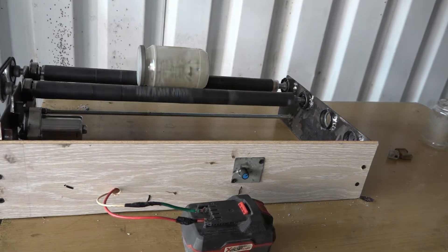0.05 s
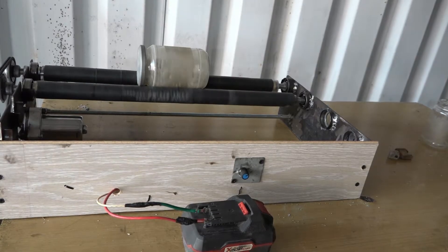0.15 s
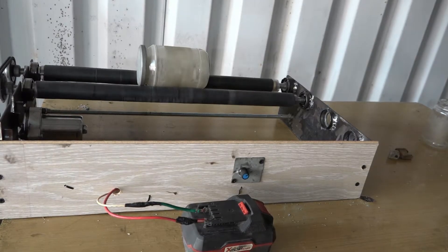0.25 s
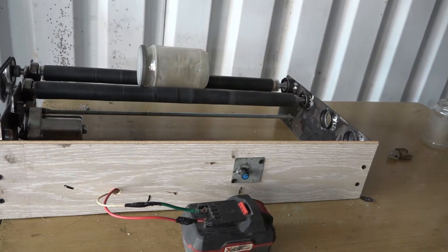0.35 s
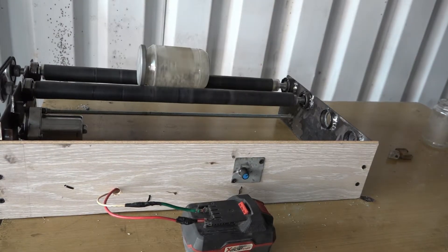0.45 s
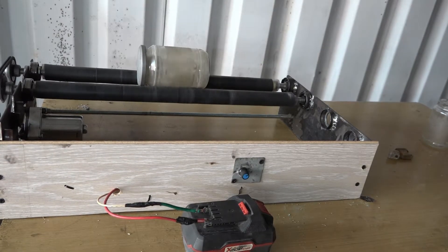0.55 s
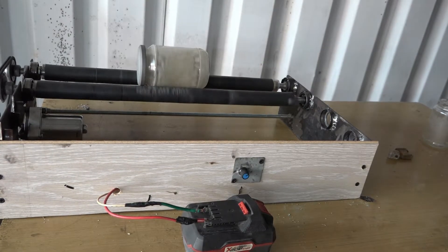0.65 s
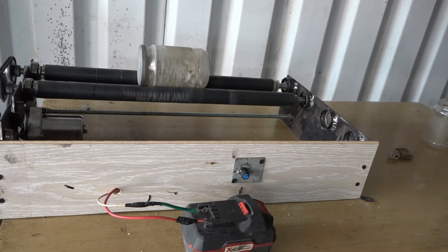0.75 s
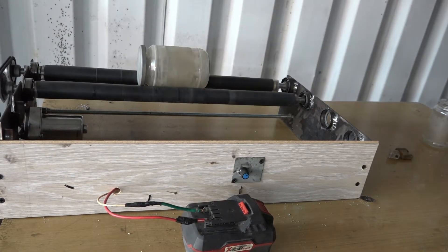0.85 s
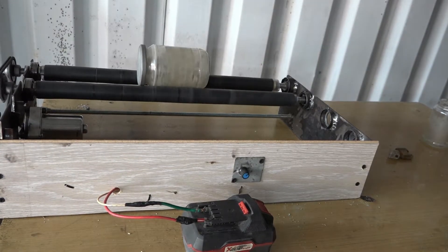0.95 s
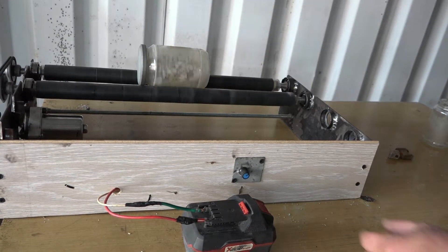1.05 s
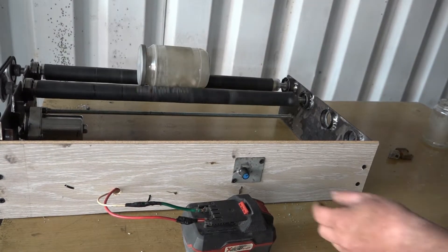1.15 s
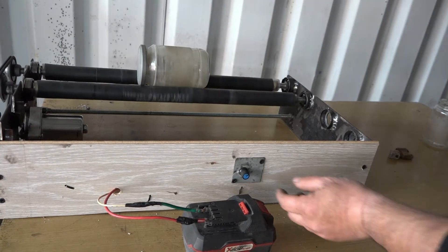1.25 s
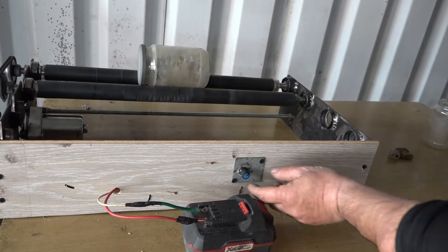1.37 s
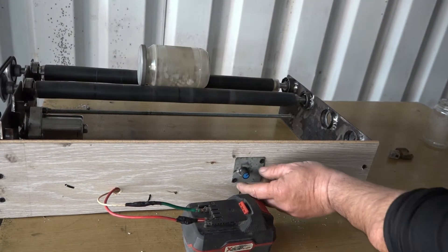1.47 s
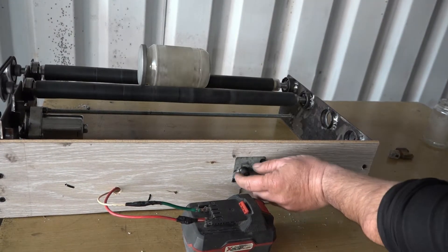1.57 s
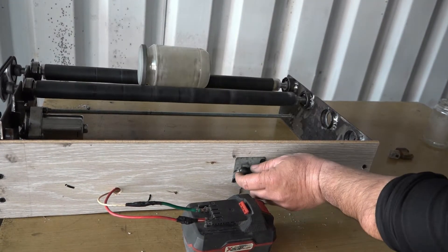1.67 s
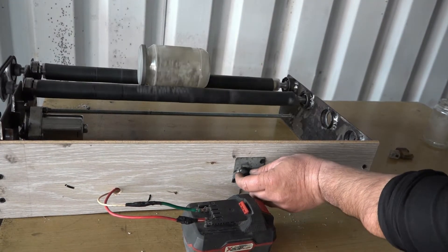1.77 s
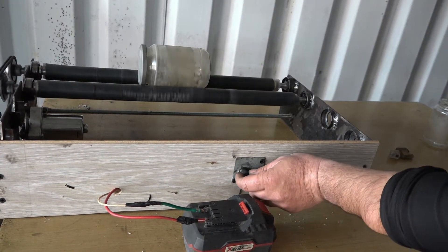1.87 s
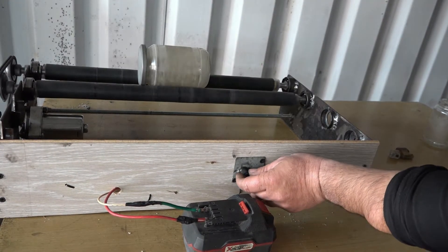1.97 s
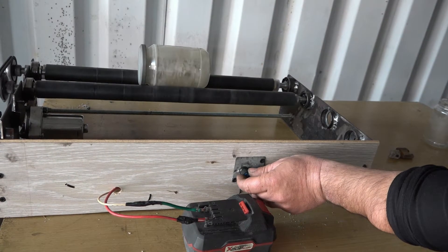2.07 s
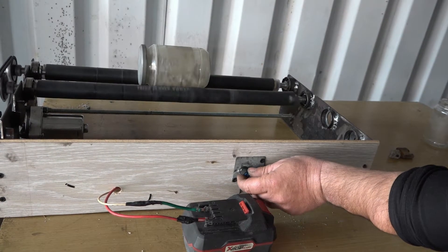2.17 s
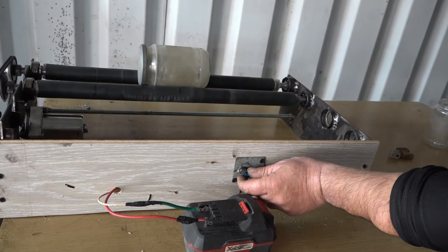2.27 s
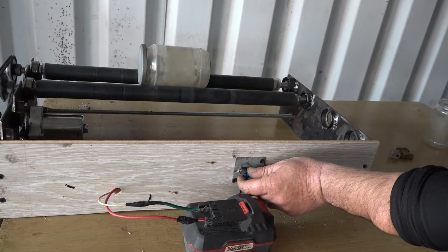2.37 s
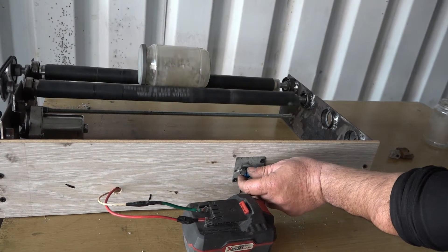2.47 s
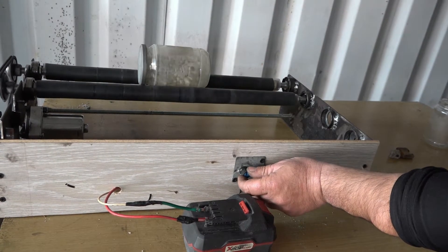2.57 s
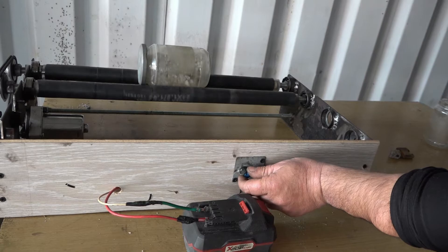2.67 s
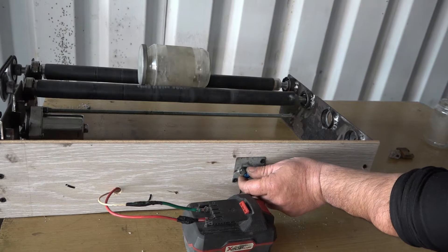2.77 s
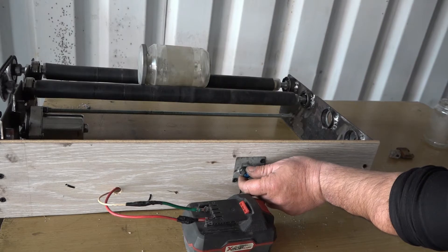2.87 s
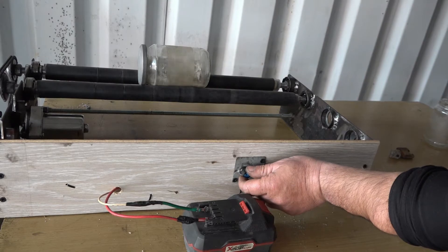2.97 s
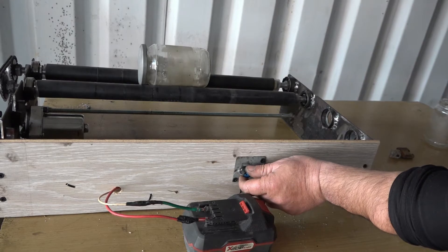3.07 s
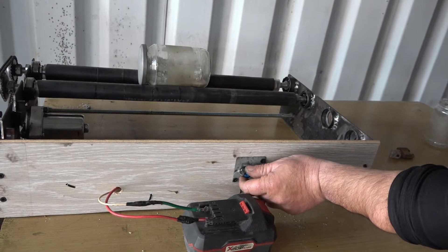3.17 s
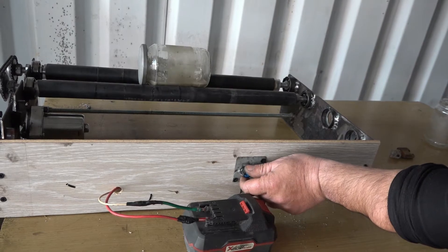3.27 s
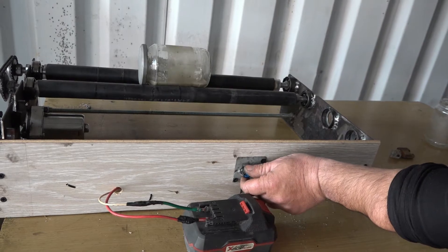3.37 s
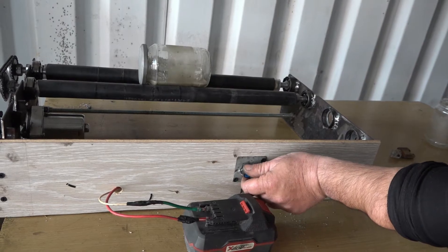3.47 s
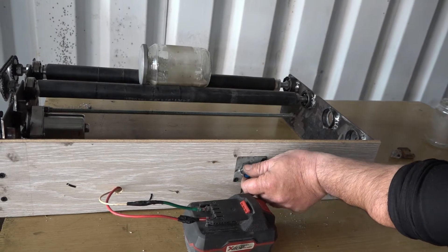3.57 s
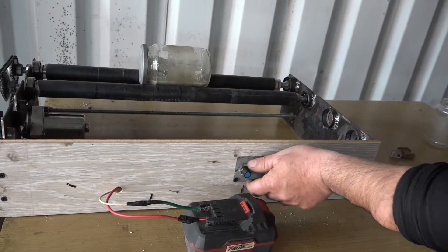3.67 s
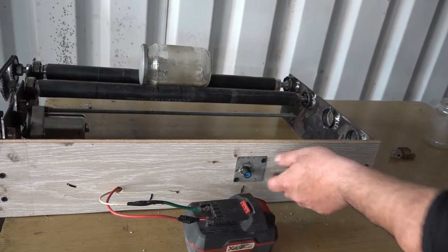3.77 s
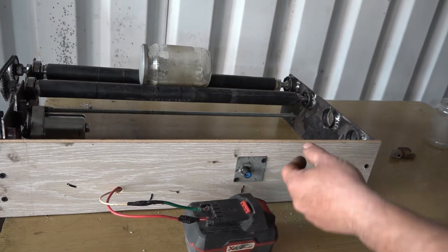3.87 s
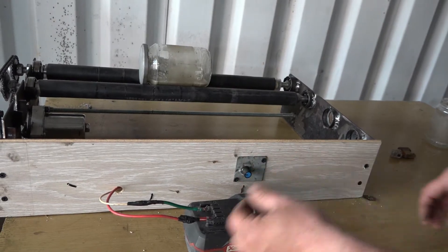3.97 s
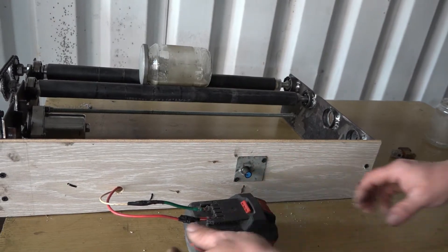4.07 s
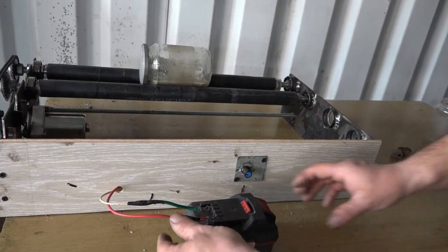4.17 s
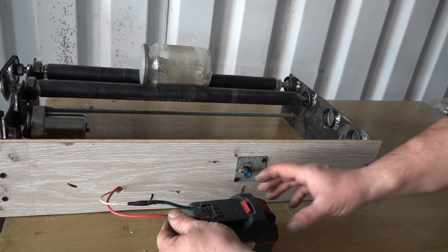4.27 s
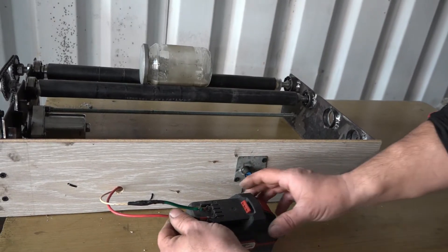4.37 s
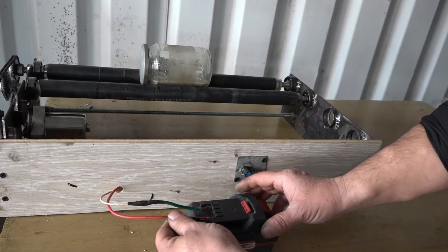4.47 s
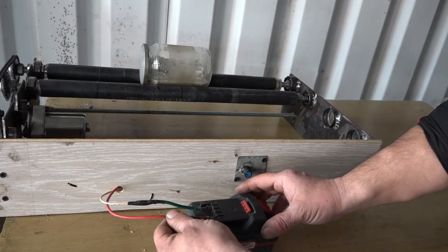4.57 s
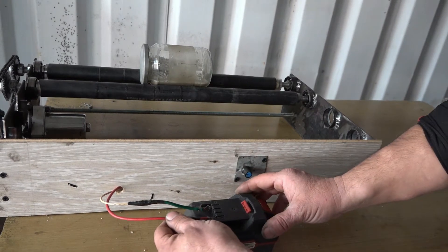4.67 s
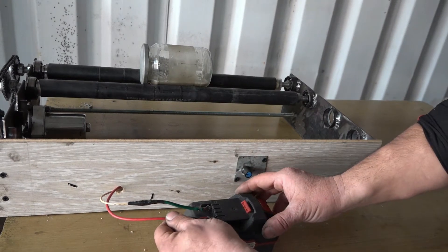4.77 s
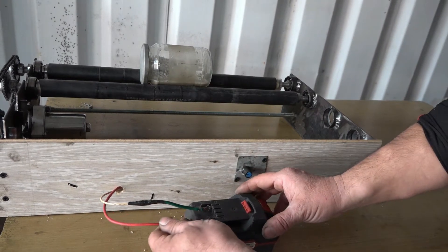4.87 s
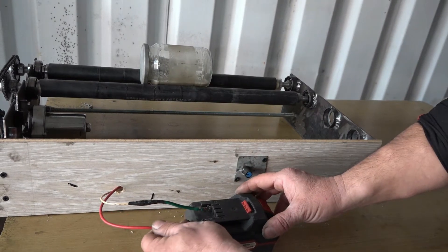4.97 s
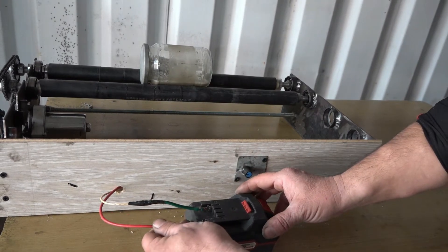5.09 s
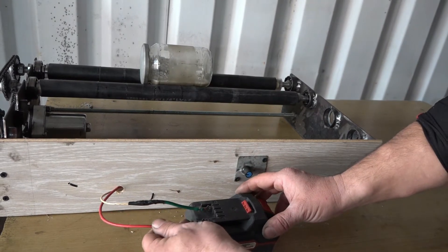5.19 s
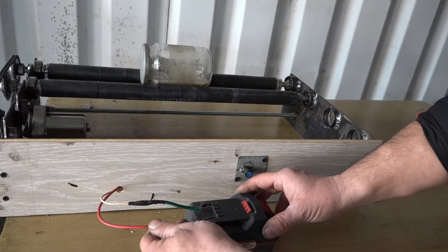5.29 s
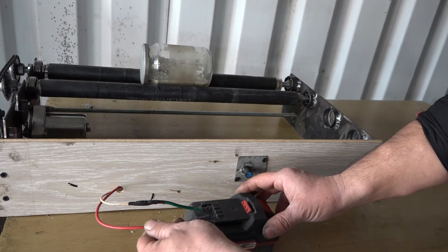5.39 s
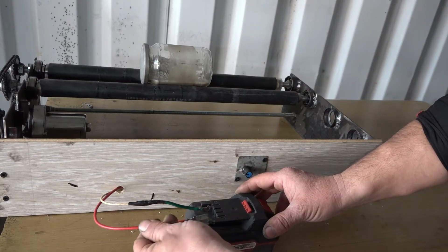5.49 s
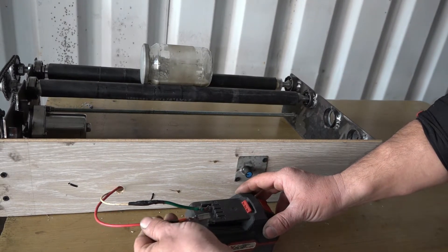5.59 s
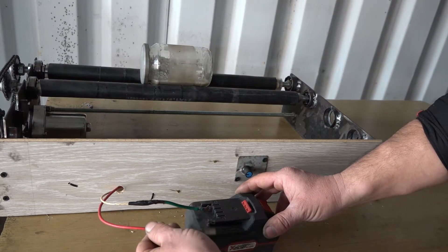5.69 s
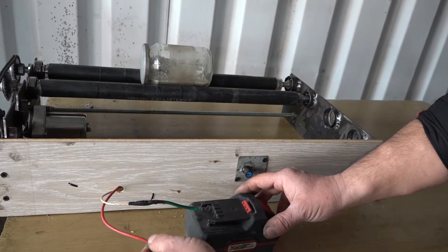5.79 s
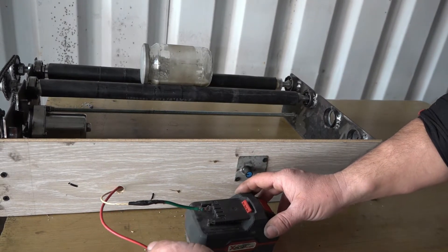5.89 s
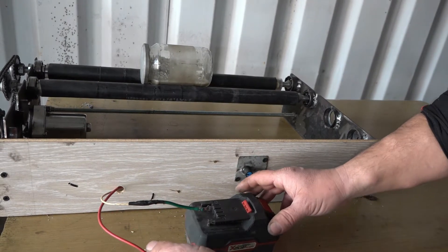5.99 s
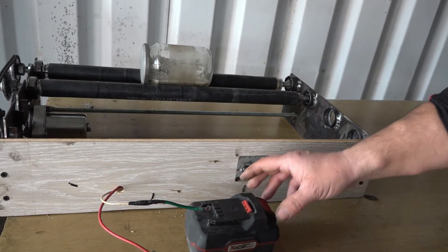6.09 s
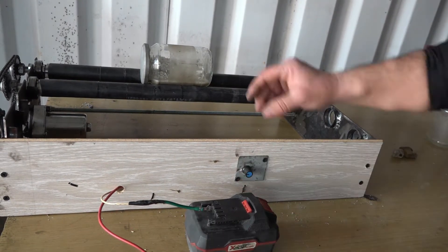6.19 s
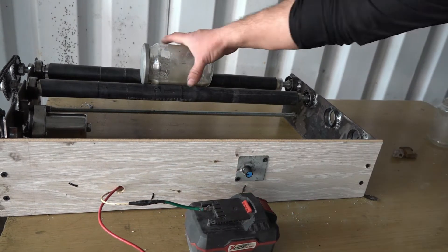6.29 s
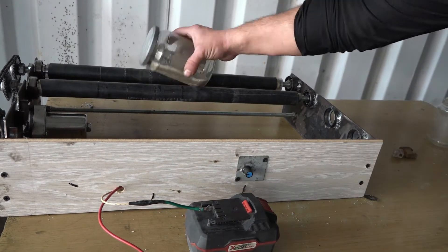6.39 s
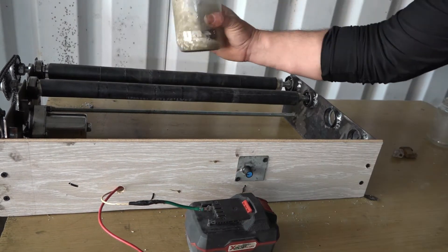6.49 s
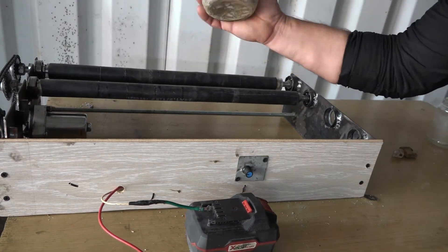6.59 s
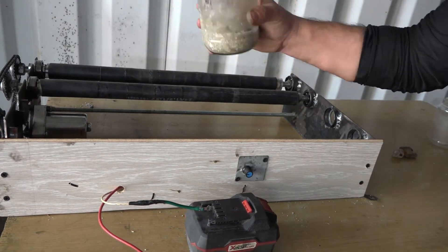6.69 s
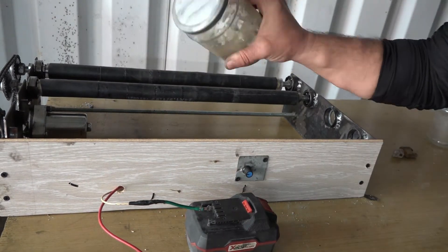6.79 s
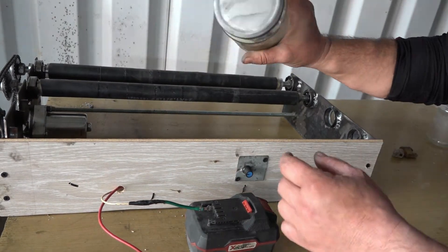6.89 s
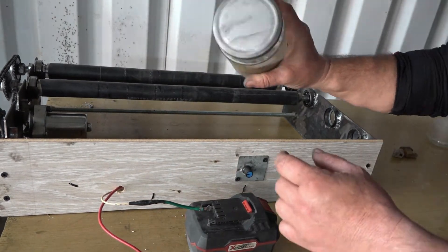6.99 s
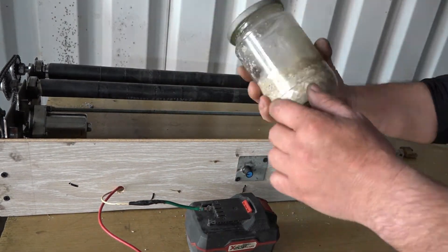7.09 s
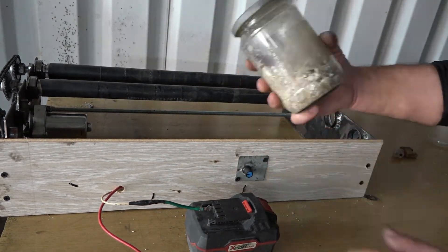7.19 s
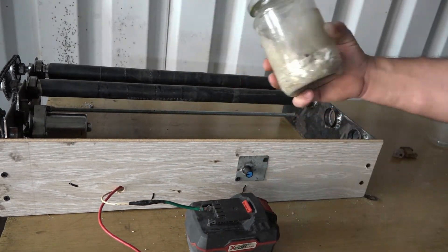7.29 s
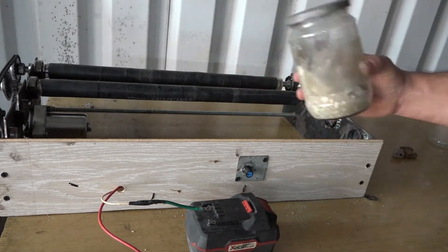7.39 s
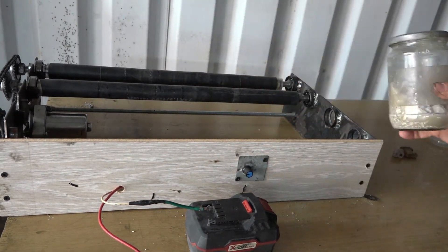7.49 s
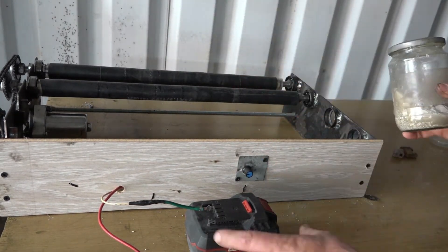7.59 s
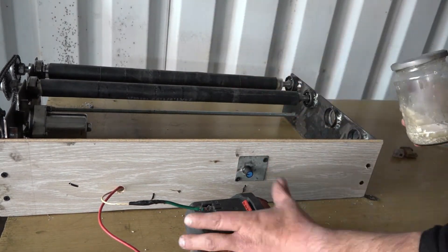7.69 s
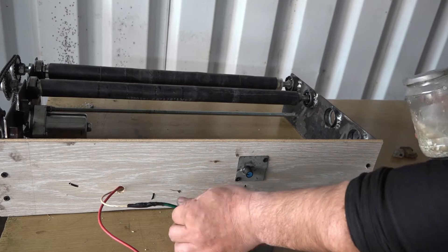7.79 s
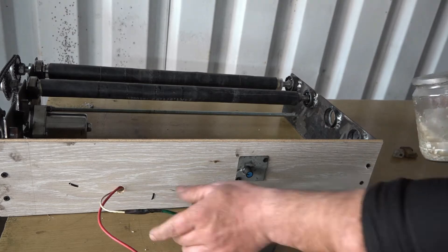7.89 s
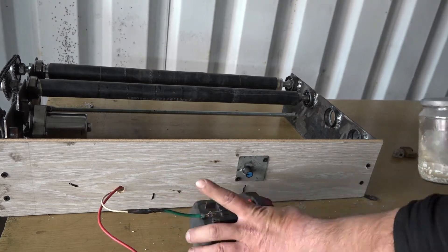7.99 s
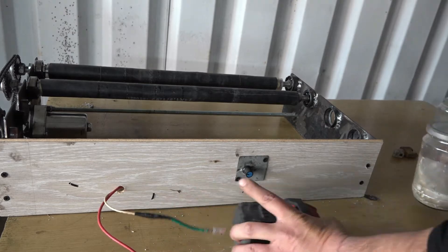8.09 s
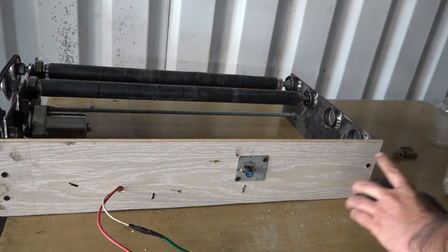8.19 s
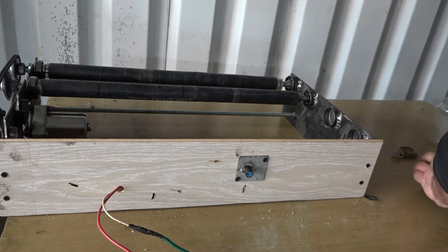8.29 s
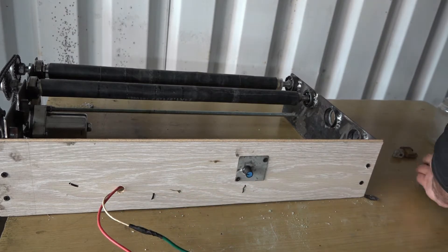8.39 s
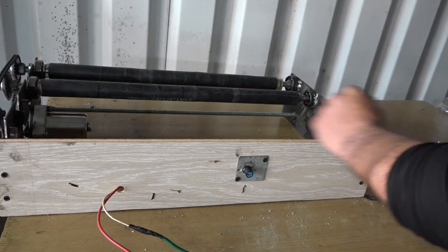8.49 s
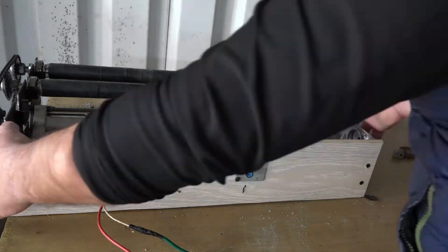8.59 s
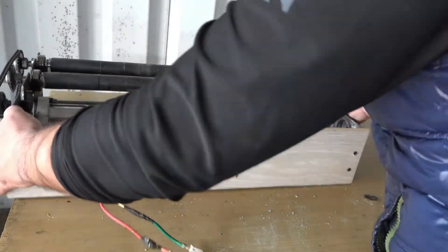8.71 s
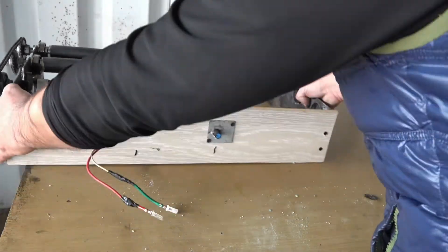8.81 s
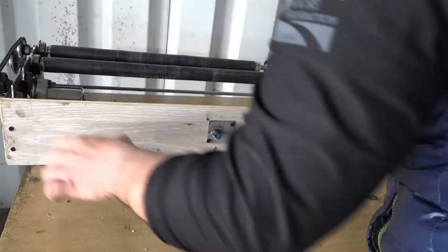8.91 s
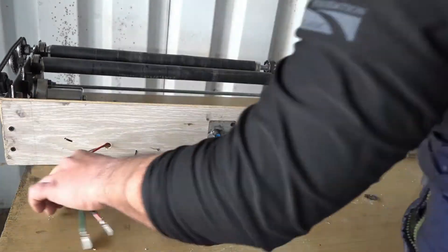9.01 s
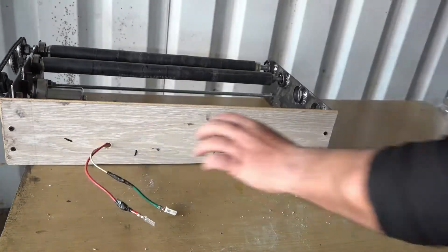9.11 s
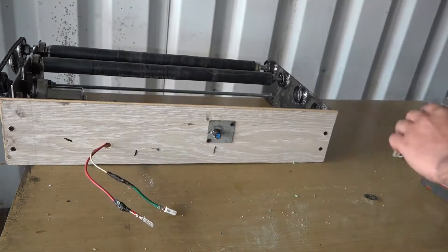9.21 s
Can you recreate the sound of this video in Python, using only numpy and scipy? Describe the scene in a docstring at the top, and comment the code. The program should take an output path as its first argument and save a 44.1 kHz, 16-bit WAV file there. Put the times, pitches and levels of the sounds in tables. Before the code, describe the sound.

Gritty glass rattle and geared motor hum wind down to quiet, followed by chirping sparrows, jar shakes, sharp ticks, wooden knocks and scrapes.

```python
"""A roller tumbler turns a glass jar of wet grit in a sheet-metal shed: tiny impacts ring the glass, the rollers
throb through the frame and the gears hum, until the motor is turned down and stops.
A hand unplugs the battery, lifts and shakes the jar, then knocks and slides things across the bench: showers
of grit, ticks, damped blows and rubbing close to the microphone. Outside, sparrows chirp in gliding, fluttering
notes over short far-off tones, a low drone and filtered noise."""
import sys
import numpy as np
from scipy import signal
from scipy.fft import rfft, irfft
from scipy.io import wavfile

SR = 44100
rng = np.random.default_rng(int(sys.argv[2]) if len(sys.argv) > 2 else 0)


def to_wav(s):
    """Save 16-bit WAV."""
    ch = np.atleast_2d(s).T  # columns
    pcm = np.round(np.clip(ch, -1, 1) * 32767)  # PCM
    wavfile.write(sys.argv[1], SR, pcm.astype(np.int16))


N = 407925
T = np.arange(N) / SR
HZ = np.fft.rfftfreq(8192, 1 / SR)  # filter grid

# resonances of the glass jar: [f/Hz, width/Hz, lift/dB]
GLASS_MODES = [(1574, 20, 9), (2070, 17, 1.5), (2164, 42, 6.5), (2304, 57, 9.5), (2525, 77, 3.5),
               (2820, 49, 3.5), (2935, 37, -0.5), (3113, 72, 5), (3410, 72, 6.5), (3680, 39, 9),
               (3770, 23, 6), (3990, 140, 3.5), (4245, 47, 7.5), (5044, 62, 6), (5300, 100, 4.5),
               (5600, 57, 8), (6000, 35, 6.5), (5930, 39, 6), (6350, 57, 9.5), (6620, 34, 3), (6950, 93, 5),
               (7400, 29, 1), (7800, 75, 3.5)]
# smooth spectrum of the roller frame: [f/Hz, relative level/dB]
FRAME_BODY = [(50, -32), (110, -33), (160, -10.5), (230, -6.5), (310, -2.5), (450, -0.5), (650, -0.5),
              (900, -0.5), (1400, -5), (2000, -0.5), (3000, -40.5)]
# resonances of the roller frame: [f/Hz, width/Hz, lift/dB]
ROLLER_MODES = [(134.7, 9, 11), (196.7, 5.6, 12.5), (222.7, 16, 10.5), (243, 21, 4.5), (365, 18, 8.5),
                (406.4, 41, 7.5), (425.4, 19, 7.5), (513, 26, 3.5), (584.3, 21, 9.5), (655, 32, 7),
                (689.6, 16, 7.5), (799, 12, 5.5), (825, 15, 5.5), (893, 7, 4), (955, 27, 4),
                (1001.5, 26, 13), (1139, 7.9, 11.5), (1215, 8.6, 8), (1252, 31, 10.5), (1340, 8, 11.5)]
# resonances of the bench top: [f/Hz, width/Hz, lift/dB]
BENCH_MODES = [(148, 9.2, 6), (344, 81, 5.5), (394, 76, 5.5), (701, 38, 9), (776, 31, -2), (1236, 73, 5),
               (1710, 130, 4.5)]


def tumbler():
    """Grit pours on the turning glass, rollers throb through the frame, gears hum; all follow the motor's speed."""
    # motor, steady until the knob is turned down: [t/s, gear mesh f/Hz]
    motor = [(0, 283.2), (.9, 287.4), (1.75, 285.5), (2.07, 279), (2.2, 242.2), (2.42, 177), (2.85, 111),
             (3.12, 42), (3.31, 2.3)]
    # the level of coarse grit and frame dips briefly: [t/s, depth/dB]
    dips = [(.85, 4.5), (1.16, 4), (1.232, 6.5), (1.86, 4), (2.67, 3)]
    dip_s = 0.0086
    gear_hz = np.maximum(curves(motor)[0], 1)
    speed = gear_hz / gear_hz[0]  # share of the starting speed, called full speed here
    turning = T < motor[-1][0]
    # above this share of full speed the grit pours hardly any harder
    full_pour = 0.66
    pour_db = 20 * np.log10(np.tanh(speed / full_pour) / np.tanh(1 / full_pour))
    dip_db = sum(depth * np.exp(-.5 * ((T - s) / dip_s) ** 2) for s, depth in dips)
    machine = pouring_grit(speed, pour_db, dip_db) + rollers(speed, pour_db, dip_db) + gears(gear_hz)
    return machine * turning


def pouring_grit(speed, pour_db, dip_db):
    """Stones fall on the ringing glass, fewer each second as the jar slows; softer blows sound duller."""
    # the grit's smooth spectrum: [f/Hz, relative level/dB]
    grit_body = [(700, -28), (1400, -12), (2100, -5), (2700, -3.5), (3500, 0.5), (4700, 3), (5500, 0.5),
                 (6300, -7.5), (7100, -8.5), (8400, -5.5), (9400, -15.5), (11500, -18), (14000, -20),
                 (15900, -24.5)]
    split_hz, dull_hz = 6800, 2600
    # level at full speed, and the dB lost for each dB that the pour weakens
    coarse_db, coarse_fall = -18, 1.41
    splash_db, splash_fall = -25.5, 1.57
    # lift of the jar's low resonances at full speed, and its growth for each dB that the pour weakens
    soft_db, soft_growth = 5.5, 0.33
    surge_db = 0.69
    impacts = grains(N, 20000 * speed, 2.36) / np.sqrt(speed)
    grit = unit(colour(impacts, read(grit_body) + lifts(GLASS_MODES)))
    fine_filter = signal.butter(4, split_hz, "high", fs=SR, output="sos")
    dull_filter = signal.butter(3, dull_hz, fs=SR, output="sos")
    fine = signal.sosfiltfilt(fine_filter, grit)
    dull = signal.sosfiltfilt(dull_filter, grit)
    # softer blows excite the low resonances more than the high ones
    softened = grit - fine + dull * (amp(soft_db - soft_growth * pour_db) - 1)
    coarse = softened / np.std(grit - fine) * amp(coarse_db + coarse_fall * pour_db - dip_db)
    splash = unit(fine) * np.hypot(amp(splash_db + splash_fall * pour_db), clinks())
    return (coarse + splash) * amp(surge_db * wander(19.0))


def clinks():
    """Envelope of the bright ring that single stones leave in the turning glass."""
    # single stones: [t/s, level/dB]
    stones = [(.84, -17), (2.664, -22), (2.92, -20.5), (3.098, -38), (3.126, -31.5)]
    rise_s, t60_s = .001, 0.095
    out, t = np.zeros(N), T[:SR // 4]
    for s, db in stones:
        add(out, s, np.minimum(t / rise_s, 1) * amp(db - 60 * t / t60_s))
    return out


def rollers(speed, pour_db, dip_db):
    """Small blows ring the frame, and each round of the throb makes them stronger and weaker."""
    throb_hz, throb_db = 8.7, 1.5  # rate at full speed
    frame_db, frame_fall = -24, 1.14  # level at full speed, dB lost for each dB that the pour weakens
    lurch_db = 1.0
    throb_phase = 2 * np.pi * throb_hz * np.cumsum(speed) / SR + 0.5 * wander(0.26)
    throb = np.sin(throb_phase) + 0.19 * wander(37)
    blows = grains(N, 9000, 1.87) * amp(throb_db * throb)
    frame = unit(colour(blows, read(FRAME_BODY) + lifts(ROLLER_MODES)))
    return frame * amp(frame_db + frame_fall * pour_db - dip_db + lurch_db * wander(6))


def gears(gear_hz):
    """The teeth mesh in a hum with an unsteady whine above; the frame radiates little of the lowest pitches."""
    gear_db, whine_db = -34.5, -10  # the whine is relative to the mesh tone
    whine_order = 4.42  # whine pitch over mesh pitch
    radiates_hz, radiation_power = 212, 7.5
    mesh = 2 * np.pi * np.cumsum(gear_hz * (1 + 0.0057 * wander(12))) / SR
    whine = amp(whine_db) * wander(9.0) * np.sin(whine_order * mesh)
    hum = unit(np.sin(mesh) + 0.1 * np.sin(2 * mesh) + whine)
    # the hum fades quickly once its pitch is too low for the frame to radiate
    radiated = 1 / np.hypot(1, (radiates_hz / gear_hz) ** radiation_power)
    return hum * radiated * amp(gear_db + 2.3 * wander(30))


def topples():
    """Stones fall over in the slowing jar: bursts of small blows that each favour one resonance of the frame."""
    # bursts: [t/s at the peak, rise/s, fall/s, level/dB, strongest ring f/Hz]
    falls = [(2.775, 0.023, 0.023, -27, 420), (3.0, .035, 0.058, -32, 670), (3.12, .03, 0.046, -33.5, 680)]
    ring_width_hz, ring_db, bright_db = 55, 8, 3  # brightness in dB per octave
    body = read(FRAME_BODY) + lifts(ROLLER_MODES)
    out = np.zeros(N)
    for s, rise, fall, db, hz in falls:
        ringing = body + lifts([(hz, ring_width_hz, ring_db)])
        out += strokes([(s, rise, fall, db, bright_db)], ringing, per_s=1600, spread_db=4.5)
    return out


def shakes():
    """Each swing throws a dense shower of grit on the glass, whose ring the hand damps."""
    # grit thrown about in the lifted jar: [t/s at the peak, fall/s, level/dB]
    swings = [(6.582, 0.02, -33), (6.625, .025, -26), (6.724, 0.038, -31.5), (6.785, 0.01, -32.5),
              (6.902, 0.0082, -38), (6.935, 0.032, -28.5), (7.08, .033, -37.5), (7.163, .0063, -30.5),
              (7.193, 0.026, -26.5), (7.28, 0.022, -31.5), (7.357, 0.014, -31), (7.405, 0.023, -26.5),
              (7.467, 0.031, -26)]
    # smooth spectrum of the shower: [f/Hz, relative level/dB]
    shaken_body = [(350, -41), (600, -26), (1140, -16.5), (1700, -10.5), (2210, -9), (3340, -4.5),
                   (3780, -0.5), (4580, -5), (5480, 1), (6730, -14.5), (8160, -4.5), (10700, -18),
                   (13900, -17), (16000, -23)]
    rise_s = 0.012
    damped = 0.23  # share of the glass lifts that remains under the hand
    force = np.zeros(N)
    for s, fall, db in swings:
        start, shape = swell(s, rise_s, fall)
        add(force, start, amp(db) * shape)
    shower = grains(N, 9000, 2.6)
    return colour(force * shower, read(shaken_body) + damped * lifts(GLASS_MODES))


def ticks():
    """Single hard contacts of stones and plastic: a crack that is gone within milliseconds."""
    # sharp ticks: [t/s, level/dB before a common lift of 4.5 dB, treble/dB]
    contacts = [(2.665, -18, 0), (5.003, -36.5, -3), (6.298, -35, -14), (6.576, -21, -3), (6.584, -32, -4),
                (6.597, -22, -1), (6.697, -26, 5), (6.718, -25, 3), (6.738, -23, 2), (6.785, -23, 0),
                (6.923, -20.5, 5), (7.139, -24.5, -4), (7.178, -18.5, -3.5), (7.266, -24, -5),
                (7.347, -30, -7), (7.397, -22.5, -6), (7.997, -30, -22), (8.008, -36, -17),
                (8.187, -28, -17), (8.233, -18, -7), (9.118, -28, -13)]
    t60_s = .008
    out, t = np.zeros(N), T[:4096]
    for s, db, treble in contacts:
        crack = rng.standard_normal(len(t)) * amp(-60 * t / t60_s)
        low = [(300, -13), (1200, -12.0), (4500, -2)]
        high = [(8000, treble), (11000, treble - 7), (15000, treble - 10)]
        add(out, s, amp(db + 4.5) * colour(crack, read(low + high)))
    return out


def knocks():
    """Dull blows on the wooden bench; the place that is struck favours one mode."""
    # blows: [t/s, level/dB, time to fall 60 dB/s, favoured mode f/Hz, its level relative to the blow/dB]
    blows = [(7.341, -41, 0.14, 172, -1), (7.67, -42, 0.11, 298, 6), (8.423, -26.5, 0.048, 343, -3),
             (8.494, -17, 0.053, 780, -12), (8.52, -30, 0.036, 386, 4), (8.835, -28, 0.083, 353, 9.5),
             (8.853, -26, 0.045, 387, 7.5), (8.904, -33, 0.045, 403, -7), (9.064, -36, 0.028, 2300, 11.5)]
    # smooth spectrum of a blow: [f/Hz, relative level/dB]
    blow_body = [(60, -44), (140, -3), (260, -7), (400, -2.5), (800, -0.5), (1200, -2.5), (1900, -10),
                 (2600, -16), (4000, -34), (9000, -55)]
    mode_t60_s = 0.083
    out, t = np.zeros(N), T[:8192]
    for s, db, ring, hz, mode_db in blows:
        noise = rng.standard_normal(len(t)) * amp(-60 * t / ring)
        blow = colour(noise, read(blow_body) + lifts(BENCH_MODES))
        mode = np.sqrt(2) * np.sin(2 * np.pi * hz * t) * amp(mode_db - 60 * t / mode_t60_s)
        add(out, s, amp(db) * (blow + mode))
    return out


def drags():
    """Things slid over the bench: many small slips ring its top."""
    # slides: [t/s at the peak, rise/s, fall/s, level/dB, brightness/dB per octave]
    slides = [(8.425, .012, 0.013, -29.5, -0.5), (8.75, 0.11, 0.046, -46.5, 2.5),
              (8.815, .02, 0.045, -27, 3.5), (8.842, .008, 0.021, -22, 1.5),
              (8.878, .014, .028, -23.5, 0.5)]
    # smooth spectrum of a slide: [f/Hz, relative level/dB]
    slide_body = [(70, -36), (140, -11), (230, -1.5), (330, -4.5), (520, 0), (720, -5.5), (950, -12.5),
                  (1300, -14.5), (2000, -20), (3500, -30), (7000, -46), (14000, -65)]
    return strokes(slides, read(slide_body) + lifts(BENCH_MODES), per_s=2500, spread_db=2.0)


def bumps():
    """Dull bumps of handling: sparse small impacts with little treble."""
    # bumps: [t/s at the peak, rise/s, fall/s, level/dB, brightness/dB per octave]
    thuds = [(4.08, 0.069, 0.24, -49, -3.5), (4.4, 0.086, 0.2, -44, -0.5), (4.8, 0.11, 0.29, -45, -5),
             (5.35, .12, 0.12, -52.5, 2), (5.72, 0.05, 0.088, -42.5, -0.5), (6.2, .2, 0.16, -51.5, -1),
             (6.98, 0.031, 0.036, -50, -10), (7.36, 0.021, 0.067, -38, -2.5),
             (7.6, 0.056, 0.1, -35.5, -0.5)]
    # smooth spectrum of a bump: [f/Hz, relative level/dB]
    thud_body = [(25, -40), (55, -11), (100, -1), (180, -2), (270, -4), (450, -5), (650, -15.5),
                 (1000, -21.5), (1600, -28), (3000, -45)]
    return strokes(thuds, read(thud_body), per_s=1100, spread_db=1.0)


def rubs():
    """Sleeve and plastic rubbing: a dense run of small slips."""
    # rubs: [t/s at the peak, rise/s, fall/s, level/dB, brightness/dB per octave]
    rubbing = [(3.92, 0.086, .1, -49, 4), (4.22, .16, 0.16, -45.5, 3.5), (4.95, 0.026, 0.022, -42.5, 1.5),
               (5.005, 0.015, 0.038, -40, 0), (6.2, 0.12, 0.43, -54.5, 4.5), (6.28, 0.05, 0.026, -53, 1),
               (7.997, 0.0078, 0.012, -36.5, 1.5), (8.234, 0.0079, 0.012, -30, 3),
               (8.6, 0.17, 0.51, -48.5, 0), (8.905, .015, 0.014, -34, 1.5),
               (9.07, 0.0075, 0.012, -24.5, 0.5), (9.14, 0.024, 0.045, -38.5, 1)]
    # smooth spectrum of the rubbing: [f/Hz, relative level/dB]
    rubbing_body = [(180, -72), (300, -8), (689, -8), (801, 0.5), (1100, -2), (1410, 0.5), (1870, -3.5),
                    (2320, -3.5), (3130, -5), (4990, -6.5), (7440, -15.5), (16000, -38)]
    return strokes(rubbing, read(rubbing_body), per_s=9000, spread_db=1.5)


def strokes(rows, body_db, per_s, spread_db):
    """Many small slips or blows under each stroke, tilted by that stroke's own brightness."""
    out = np.zeros(N)
    octaves = np.log2(np.maximum(HZ, 100) / 1000)  # from 1 kHz
    for s, rise, fall, db, bright in rows:
        start, shape = swell(s, rise, fall)
        slips = colour(grains(len(shape), per_s, spread_db), body_db + bright * octaves)
        add(out, start, amp(db) * unit(slips * shape) * np.sqrt(np.mean(shape ** 2)))
    return out


def sparrows():
    """Harsh, fluttering chirps from both sides of the syrinx, followed by the ring of the metal walls."""
    flutter_db = 3
    second_voice, second_db = .8, -9  # pitch ratio and level of the second side
    full_bend_s = 0.104  # shorter calls bend less
    low_hz, high_hz = 2600, 5550
    direct, reflected = np.zeros(N), np.zeros(N)
    bend = .08 * np.sin(2 * np.pi * 130 * T) + .03 * wander(600) + .06 * wander(70)
    flutter = amp(flutter_db * wander(55))
    for s, hz, db, room_db in calls():
        count = len(hz)
        now = slice(round(s * SR), round(s * SR) + count)
        bend_share = np.sqrt(min(count / SR / full_bend_s, 1))
        phase = 2 * np.pi * np.cumsum(hz * (1 + bend[now] * bend_share)) / SR
        voice = (np.sin(phase) + amp(second_db) * np.sin(second_voice * phase)) * flutter[now]
        chirp = amp(db) * unit(voice) * signal.windows.tukey(count, .6)
        add(direct, s, chirp)
        add(reflected, s, amp(room_db) * chirp)
    heard = .45 * direct + .9 * echoes(direct, t60=.12) + echoes(reflected, t60=0.64)
    # the throat and beak pass little outside the range of the notes
    throat = signal.butter(5, [low_hz, high_hz], "bandpass", fs=SR, output="sos")
    return signal.sosfilt(throat, heard)


def calls():
    """Every sparrow call: start, pitch contour, level before the shed and reflected share."""
    # cheeps of a far sparrow: [t/s, length/s, level/dB before the shed]
    cheeps = [(3.184, 0.15, -45.5), (3.511, 0.14, -46), (3.976, 0.14, -44.5), (4.302, 0.15, -44),
              (4.861, .15, -39.5), (5.055, .225, -43), (5.404, .11, -42), (5.92, 0.11, -61)]
    # short chips of a nearer sparrow: [t/s, length/s, start f/Hz, level/dB before the shed]
    chips = [(3.474, 0.044, 3540, -49), (6.397, .06, 4700, -43), (6.49, .045, 5200, -37),
             (6.793, 0.045, 4640, -45), (7.044, .052, 4400, -41), (7.611, 0.033, 4820, -42),
             (7.654, 0.073, 5270, -42.5), (7.939, 0.03, 5400, -41.5), (8.017, 0.035, 4800, -47.5),
             (8.09, 0.042, 4700, -45.5), (8.139, 0.042, 4540, -45.5), (8.246, .054, 4850, -41),
             (8.351, 0.039, 4500, -44), (8.422, 0.039, 4000, -46.5), (8.546, .027, 5800, -36),
             (8.662, .04, 4900, -46), (8.876, .088, 5400, -43.5), (9.028, 0.037, 5700, -38)]
    top_hz, end_hz, slide_s, cheep_room_db = 5136, 2770, .125, 4.5
    chip_end_hz, chip_room_db = 3210, -9
    # cheeps longer than the slide hold the top note first
    for s, length, db in cheeps:
        left = np.arange(length, 0, -1 / SR)
        height = np.minimum(left / min(slide_s, length), 1)
        yield s, end_hz * (top_hz / end_hz) ** height, db, cheep_room_db
    # chips all drop to the same note
    for s, length, start_hz, db in chips:
        yield s, np.geomspace(start_hz, chip_end_hz, round(length * SR)), db, chip_room_db


def far_tones():
    """Short wavering tones of three partials from outside, blurred by the shed."""
    # tones: [t/s, length/s, f/Hz, level/dB before the shed, second and third partial/dB relative to the first]
    distant = [(4.66, .17, 1920, -47, -1, -32), (5.21, 0.31, 263.5, -61.5, 19, 10.5),
               (8.19, 0.057, 507, -34.5, -20, -27), (8.28, 0.16, 173, -38.5, -11, -22)]
    out = np.zeros(N)
    waver = 1 + .016 * wander(20) + .025 * wander(150)
    for s, length, hz, db, second_db, third_db in distant:
        t = np.arange(0, length, 1 / SR)
        phase = 2 * np.pi * np.cumsum(hz * waver[round(s * SR):][:len(t)]) / SR
        tone = np.sin(phase) + amp(second_db) * np.sin(2 * phase) + amp(third_db) * np.sin(3 * phase)
        add(out, s, amp(db) * tone * signal.windows.tukey(len(t), .8))
    return .5 * out + 0.65 * echoes(out, t60=0.58)


def drone():
    """A faint low tone of three partials swells once and sinks in pitch."""
    peak_s, swell_s, level_db = 8.83, 0.19, -41
    peak_hz, sag_hz_per_s = 75.5, 19
    hz = peak_hz - sag_hz_per_s * (T - peak_s)
    level = amp(level_db) * np.exp(-.5 * ((T - peak_s) / swell_s) ** 2)
    phase = 2 * np.pi * np.cumsum(hz * (1 + 0.012 * wander(23))) / SR
    return level * unit(np.sin(phase) + 0.36 * np.sin(2 * phase) + 0.31 * np.sin(3 * phase))


def outdoor_air():
    """Outdoor rumble and hiss: filtered noise whose level wanders."""
    # spectrum of the outdoors: [f/Hz, relative level/dB]
    outdoor_body = [(15, -44), (25, -7.5), (149, 1), (344, -6.5), (373, -8), (416, -6), (695, -12),
                    (887, -13), (1370, -15.5), (2110, -18), (2550, -17), (3340, -17), (4140, -19.5),
                    (6210, -23), (16000, -39)]
    level_db = -48.5
    return unit(colour(rng.standard_normal(N), read(outdoor_body))) * amp(level_db + 2.5 * wander(2.5))


def amp(db):
    """Decibels to amplitude."""
    return 10 ** (np.asarray(db) / 20)


def unit(x):
    """Scale to rms 1."""
    return x / np.sqrt(np.mean(x ** 2) + 1e-20)


def read(points):
    """A short spectrum laid on the filter grid."""
    f, value = np.transpose(points)
    return np.interp(np.log(HZ + 1), np.log(f + 1), value)


def lifts(modes):
    """Resonances as lifts in dB on a smooth spectrum."""
    return sum(db / (1 + (2 * (HZ - f) / w) ** 2) for f, w, db in modes)


def curves(rows):
    """Each column of a time table, sample by sample."""
    s, *columns = np.transpose(rows)
    return [np.interp(T, s, c) for c in columns]


def add(mix, s, sound):
    """Lay a sound into the mix from the given second on."""
    part = mix[max(round(s * SR), 0):][:len(sound)]
    part += sound[:len(part)]


def colour(x, db):
    """Causal minimum-phase filter of unit energy with the given gain curve."""
    cepstrum = irfft(np.log(amp(np.maximum(db, db.max() - 90))))
    half = len(cepstrum) // 2
    # folding the cepstrum forward makes the filter causal
    cepstrum[1:half] *= 2
    cepstrum[half + 1:] = 0
    taps = irfft(np.exp(rfft(cepstrum)))[:half]
    return signal.oaconvolve(x, taps / np.linalg.norm(taps))[:len(x)]


def wander(hz):
    """Random drift of rms 1, mostly below the given rate."""
    rolloff = 1 + (np.fft.rfftfreq(N, 1 / SR) / hz) ** 4
    return unit(irfft(rfft(rng.standard_normal(N)) / rolloff, N))


def grains(size, per_s, spread_db):
    """Random tiny impacts, a few much larger than the rest."""
    hit = rng.random(size) < per_s / SR
    sign = rng.choice([-1, 1], size)
    return unit(hit * sign * amp(spread_db * np.minimum(rng.exponential(1, size), 4)))


def swell(s, rise, fall):
    """Start time and two-sided Gaussian envelope of one stroke of the hand or burst of blows."""
    t = np.arange(-3 * rise, 4 * fall, 1 / SR)
    return s + t[0], np.exp(-.5 * (t / np.where(t < 0, rise, fall)) ** 2)


def echoes(x, t60):
    """Diffuse reflections of unit energy."""
    t = T[:SR]
    tail = rng.standard_normal(SR) * amp(-60 * t / t60) * (t > .001)
    return signal.oaconvolve(x, tail / np.linalg.norm(tail))[:N]


def ports(x, width, t60, lean_db=0):
    """Reflections differ at the two microphone ports by a share that depends on frequency."""
    hz = np.fft.rfftfreq(N, 1 / SR)
    side = irfft(rfft(echoes(x, t60)) * amp(np.interp(hz, HZ, read(width))), N)
    lean_curve = np.interp(hz, HZ, lean_db * np.ones(len(HZ)))
    # this tanh turns a left-right ratio in dB into a side signal
    lean = irfft(rfft(x) * np.tanh(lean_curve * np.log(10) / (2 * 20)), N)
    return np.array([x + side + lean, x - side - lean])


def scene():
    """Machine, close handling and outdoors, each with its own spread over the two microphone ports."""
    # the machine's place in front of the microphone: [f/Hz, left-right/dB]
    machine_lean = [(60, 0), (200, -1.5), (380, -2), (700, 0.5), (2380, -.5), (4400, -1.1), (8120, 2.5),
                    (15000, 0)]
    # how much the two ports differ for the machine: [f/Hz, side-mid/dB]
    machine_width = [(60, -14), (130, -20), (280, -26), (600, -19), (1400, -41), (3000, -23), (5000, -21.5),
                     (7000, -5.5), (8300, -7.5), (10000, -1), (15000, -29)]
    # the same for the close handling: [f/Hz, side-mid/dB]
    hands_width = [(60, -17), (350, -16.5), (700, -7), (2000, -6.5), (4500, -6.5), (8000, -1.5),
                   (15000, -6)]
    # the same for the outdoors: [f/Hz, side-mid/dB]
    outside_width = [(60, -13), (200, -9.5), (1200, -11), (2400, -21), (4600, -19), (8000, 2), (15000, -6)]
    machine = tumbler() + topples()
    machine = machine + amp(-19) * echoes(machine, t60=0.54)
    hands = shakes() + ticks() + knocks() + drags() + bumps() + rubs()
    hands = hands + amp(-18) * echoes(hands, t60=.22)
    outside = sparrows() + far_tones() + drone() + outdoor_air()
    stereo = ports(machine, machine_width, t60=0.15, lean_db=read(machine_lean))
    stereo = stereo + ports(hands, hands_width, t60=0.068)
    return stereo + ports(outside, outside_width, t60=0.12)


def record(dry):
    """The recorder's band limit."""
    edge_hz = 15850
    low_pass = signal.firwin(511, edge_hz, window=("kaiser", 9), fs=SR)
    return signal.oaconvolve(dry, low_pass[None], "same")


dry = scene()
out = record(dry)
to_wav(out)
```